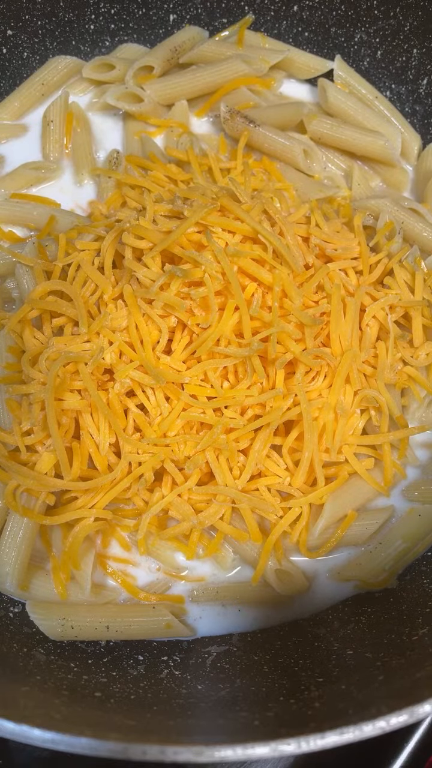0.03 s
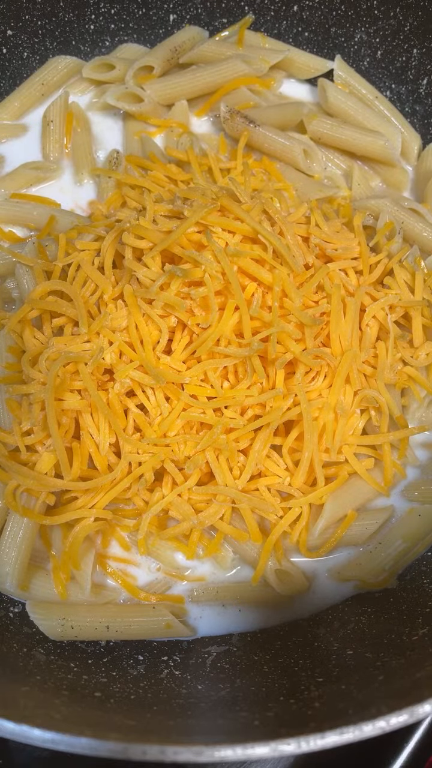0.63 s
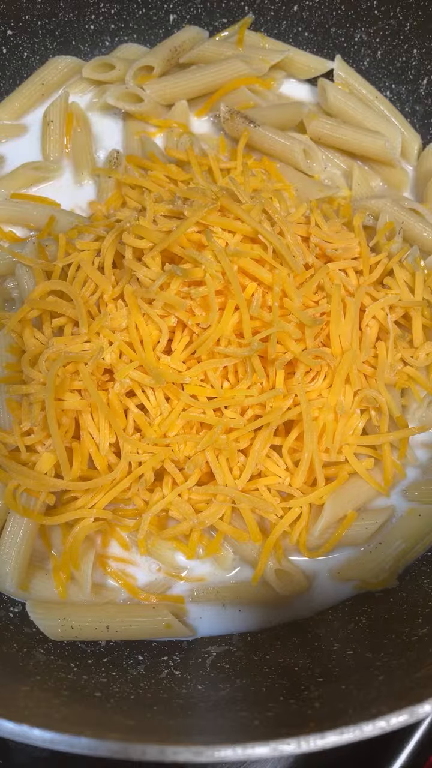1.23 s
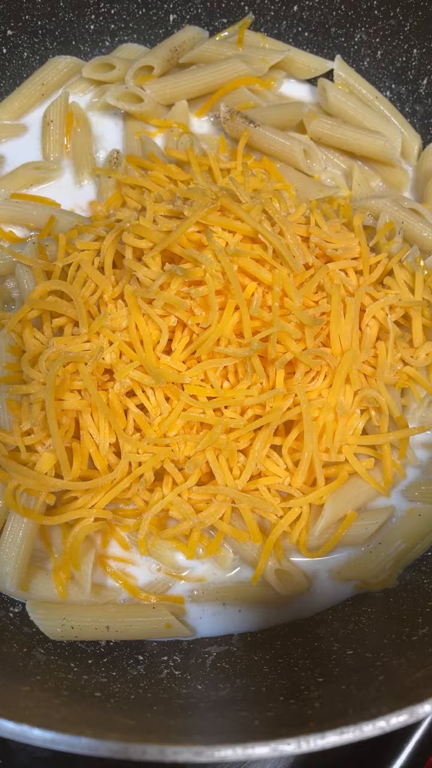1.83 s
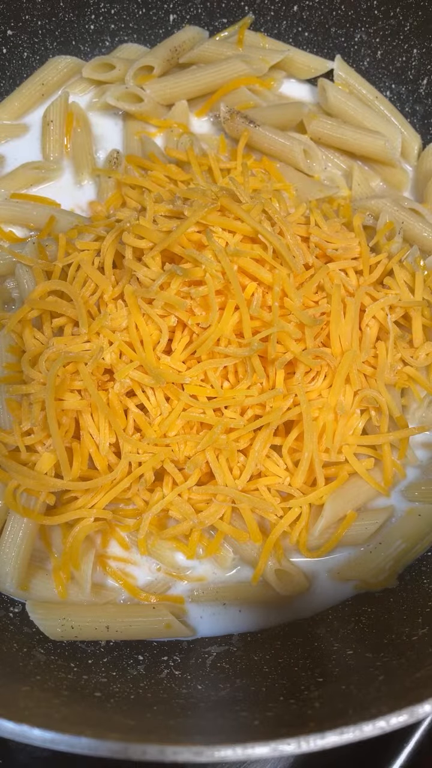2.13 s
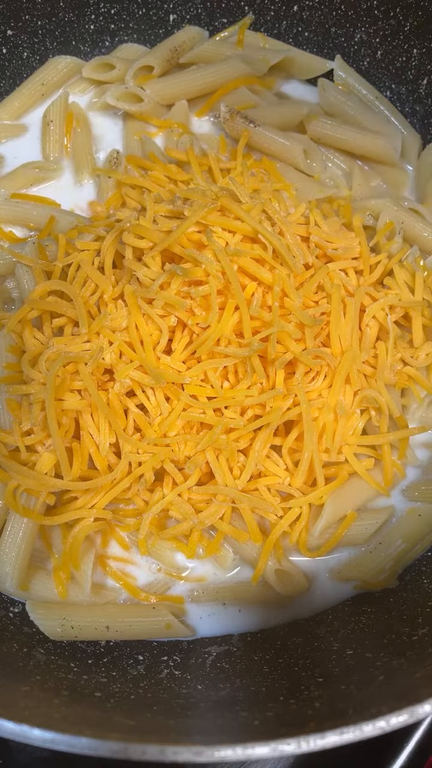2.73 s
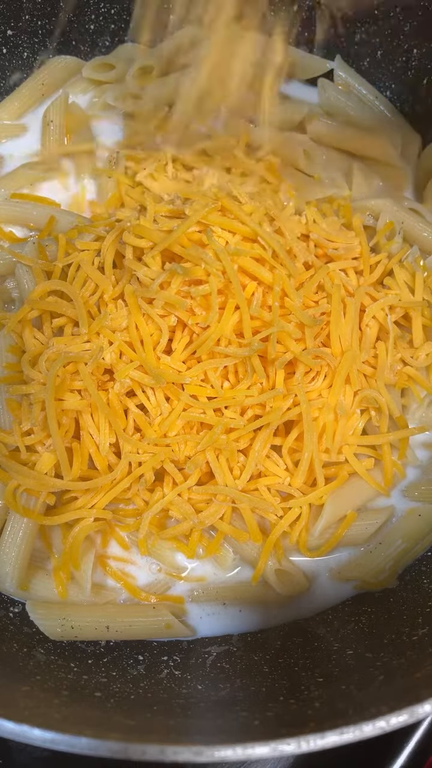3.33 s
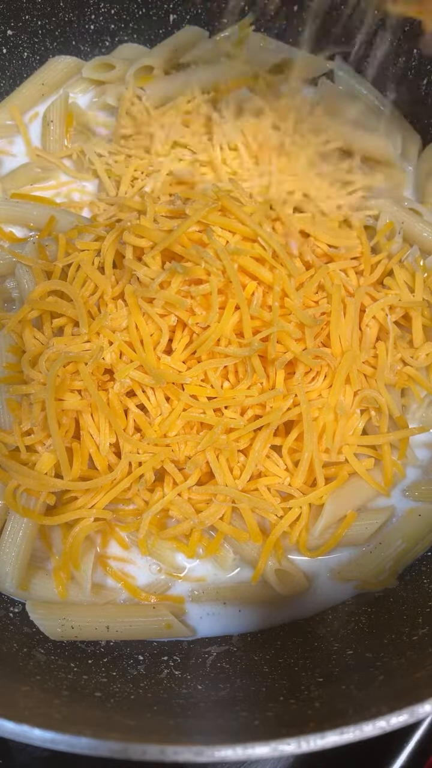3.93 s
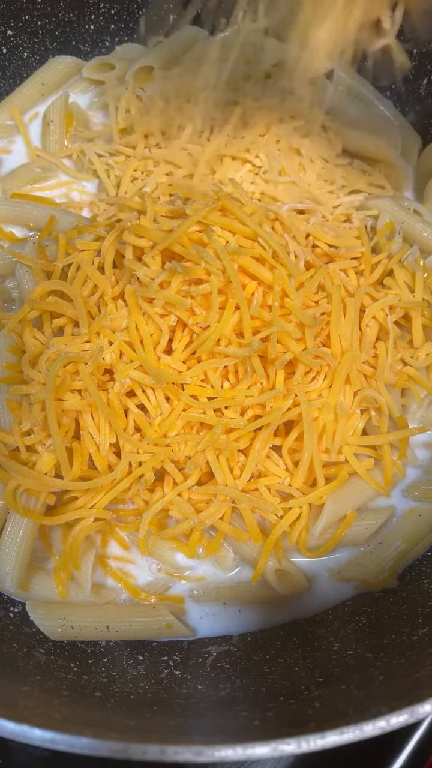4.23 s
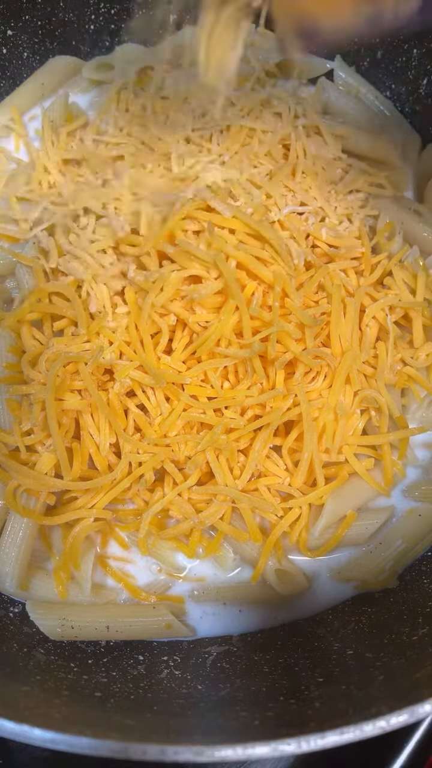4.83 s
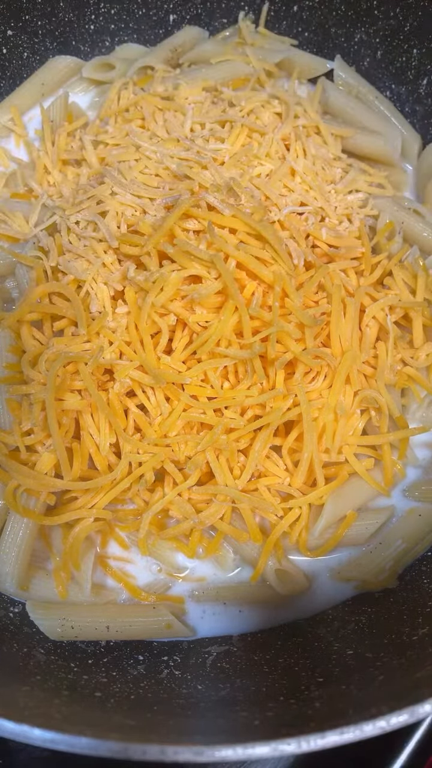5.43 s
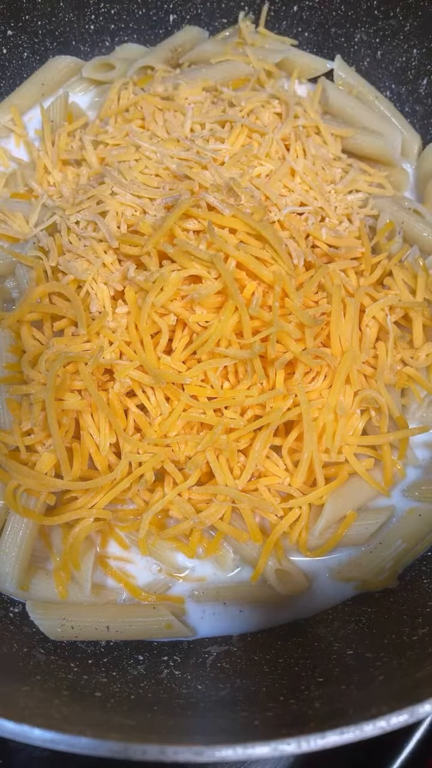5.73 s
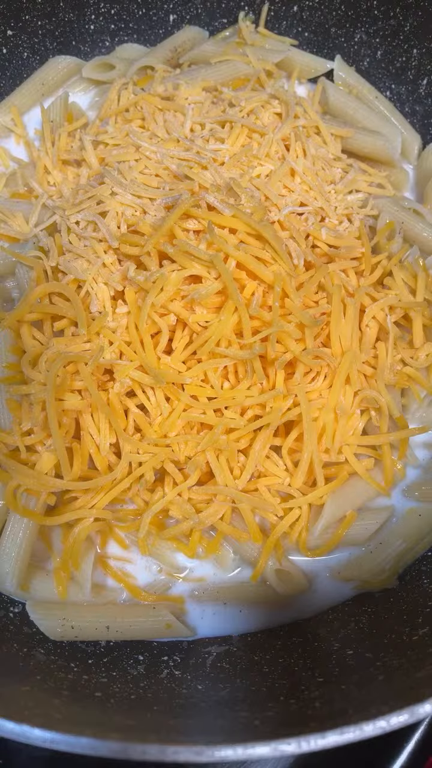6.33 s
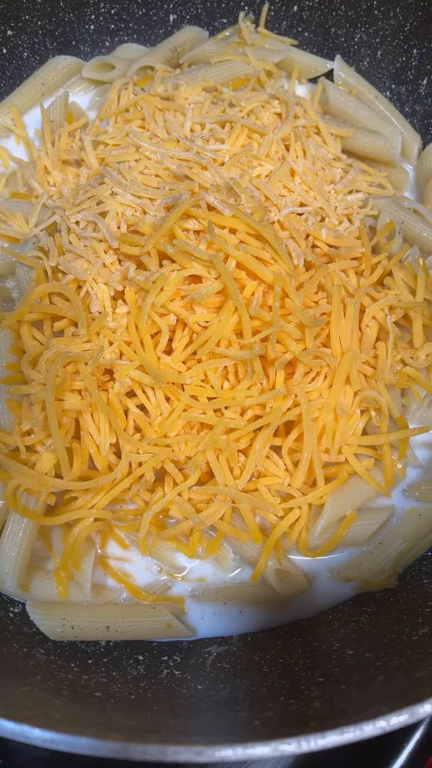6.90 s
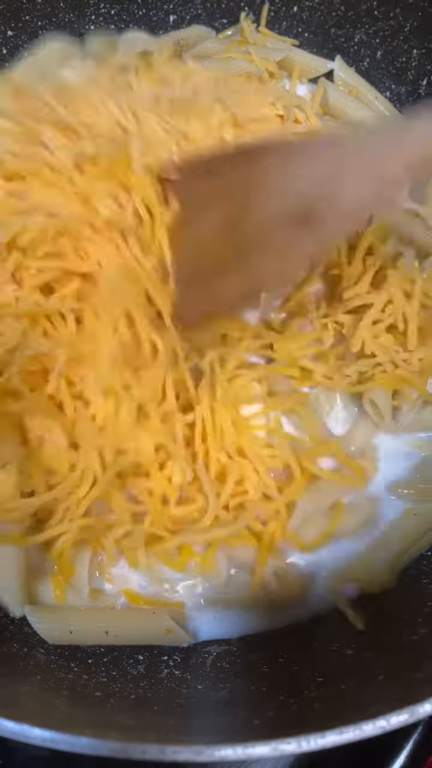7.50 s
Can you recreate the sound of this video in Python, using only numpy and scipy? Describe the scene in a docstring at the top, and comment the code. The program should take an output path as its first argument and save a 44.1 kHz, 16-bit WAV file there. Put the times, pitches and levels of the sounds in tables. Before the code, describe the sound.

In a small kitchen with a faint appliance hum, a plastic bag is handled and opened close by with sharp crackles. A run of fast, swishing shakes follows, fading as shredded cheese drops onto pasta with light pats. After another spell of crinkling, a wooden spatula hits the pan with a loud clack and makes a short, wet stir.

```python
"""First you hear a plastic bag crinkle close by: its film hisses and its creases snap as it is pulled open.
The bag is shaken over a pan of pasta, so shredded cheese tumbles inside it and patters down.
After more crinkling, a wooden spatula knocks the pan and pushes through the sticky pasta.
A small kitchen adds a short echo and a low hum."""
import sys
import numpy as np
from scipy import signal
from scipy.fft import rfft, irfft, next_fast_len
from scipy.io import wavfile

SR = 44100
rng = np.random.default_rng(int(sys.argv[2]) if len(sys.argv) > 2 else 0)


def wrap_up_sound(samples):
    """Save the sound to the file named by the first command line argument, as 16-bit audio."""
    columns = np.atleast_2d(samples).T
    # keep every value between -1 and 1, then stretch to whole-number steps
    tamed = np.clip(columns, -1, 1)
    steps = np.round(tamed * 32767).astype(np.int16)
    wavfile.write(sys.argv[1], SR, steps)


N = 337806


def amp(db):
    """Turn decibels into a gain to multiply by."""
    return 10 ** (np.asarray(db) / 20)


def unit(x):
    """Scale x to an average strength (rms) of 1."""
    return x / np.sqrt(np.mean(x ** 2) + 1e-20)


def along(points, hz):
    """Look up hz between (frequency, value) points, on a log frequency scale."""
    freqs, values = np.transpose(points)
    return np.interp(np.log(hz + 1), np.log(freqs), values)


def coloured(x, spectrum):
    """Give x a tone colour: the spectrum says how strong each frequency is."""
    size = 4096
    gains = amp(along(spectrum, np.fft.rfftfreq(size, 1 / SR)))
    cepstrum = irfft(np.log(gains))
    cepstrum[1:size // 2] *= 2  # fold it so the filter never rings ahead of a sound
    cepstrum[size // 2 + 1:] = 0
    return signal.fftconvolve(x, irfft(np.exp(rfft(cepstrum))))[:len(x)]


def add(track, s, sound):
    """Mix a sound into the track, starting at s seconds."""
    start = max(0, round(s * SR))
    track[start:start + len(sound)] += sound[:max(0, N - start)]


def ring(t, hz, t60, attack):
    """The tone of something struck: it fades by 60 dB in t60 seconds."""
    return np.sin(2 * np.pi * hz * t) * amp(-60 * t / t60) * (1 - np.exp(-t / attack))


def swell(t, s, width):
    """A smooth rise and fall around time s, about width seconds to each side."""
    return np.exp(-.5 * np.minimum(((t - s) / width) ** 2, 60))


def presses(rows, grip_db_per_s=900, relax_db_per_s=404):
    """The gain of (start, hold, level) pushes that build fast, hold and let go more slowly."""
    t = np.arange(N) / SR
    level = np.full(N, -140.0)
    for s, hold, db in rows:
        drop_db = np.maximum(grip_db_per_s * (s - t), relax_db_per_s * (t - s - hold))
        level = np.maximum(level, db - np.maximum(drop_db, 0))
    return amp(level)


def hush(spectrum):
    """Steady noise with the given tone colour."""
    return unit(coloured(rng.standard_normal(N), spectrum))


def grains(rate, hz, octaves, cycles):
    """Tiny taps, rate of them a second, each with its own pitch and size."""
    when, tuning, size = np.hsplit(rng.random((int(rate * N / SR), 3)), 3)
    pitch = hz * 2 ** (octaves * (tuning - .5))
    samples = np.arange(SR // 100)
    taps = size ** 3 * ring(samples / SR, pitch, cycles / pitch, attack=.0003)
    places = (when * N).astype(int) + samples
    return unit(np.bincount(places.ravel(), taps.ravel(), N)[:N])


def crackle(spectrum, rate, life, smooth):
    """Little bursts, each about life seconds long, over even rubbing noise of strength smooth."""
    ticks = (rng.random(N) < rate / SR) * rng.random(N) ** 4
    power = signal.lfilter([1], [1, -np.exp(-1 / (life * SR))], ticks)
    gain = np.sqrt(power / power.mean() + smooth ** 2)
    return unit(coloured(rng.standard_normal(N) * gain, spectrum))


# Tone colour of the quiet kitchen: f/Hz, level/dB
KITCHEN_COLOUR = [(40, -33), (65, -9), (140, 2.5), (200, -10), (300, -5), (560, -11.5), (2800, -31.5),
                  (11000, -28), (15800, -44)]
def background():
    """An appliance hums over steady room noise."""
    hum = amp(-59.5) * unit(np.sin(2 * np.pi * 120 * np.arange(N) / SR))
    return hum + amp(-52.5) * hush(KITCHEN_COLOUR)


# How long the echo takes to fade by 60 dB: f/Hz, t/s
ECHO_FADE = [(150, 0.53), (3000, 0.19), (14000, 0.24)]
def kitchen_echo(x, delay_s=0.0048):
    """The walls send back a short echo in which each frequency fades at its own speed."""
    hz, t, noise = signal.stft(rng.standard_normal(SR // 2), SR, nperseg=256)
    fade = amp(-60 * t / along(ECHO_FADE, hz)[:, None])
    tail = signal.istft(noise * fade, SR, nperseg=256)[1]
    delayed = np.pad(x, (int(delay_s * SR), 0))
    return signal.fftconvolve(delayed, tail / np.linalg.norm(tail))[:N]


# Tone colour of the heap of food: f/Hz, level/dB
HEAP_COLOUR = [(40, -32), (75, 4.5), (150, 3.5), (300, 5.5), (800, -37.5)]
def rumble(db):
    """The low, dull noise under the moving food and bag."""
    return amp(db) * hush(HEAP_COLOUR)


# Tone colours of the bright plastic film and of the hollow of the bag: f/Hz, level/dB
FILM_COLOUR = [(1200, -12.5), (2500, 2), (3500, 5), (5000, 3.5), (7700, -0.5), (9500, 1.5), (12000, 0),
               (13500, -8.5), (15800, -17)]
HOLLOW_COLOUR = [(120, -12.5), (520, 5), (720, 1.5), (1150, 6), (1490, 7), (1640, 5.5), (1820, 7),
                 (2650, -1), (7000, -26)]
# Light slides of the film: middle t/s, half-width t/s, level/dB
FILM_SLIDES = [(5.321, 0.058, -41), (6.81, 0.044, -53)]
def sliding():
    """The film slides lightly over itself with an even hiss."""
    t = np.arange(N) / SR
    gain = sum(amp(db) * swell(t, s, width) for s, width, db in FILM_SLIDES)
    return gain * (hush(FILM_COLOUR) + amp(-0.5) * (hush(HOLLOW_COLOUR) + rumble(-17)))


# Pushes through the pasta: start t/s, hold t/s, level/dB
PASTA_STIRS = [(7.385, 0.068, -43), (7.565, 0.021, -48)]
def stirring():
    """The spatula drags through sticky pasta with small wet clicks."""
    squelch = crackle(HOLLOW_COLOUR, rate=240, life=.0009, smooth=0.84)
    clicks = crackle(FILM_COLOUR, rate=200, life=0.00058, smooth=0.74)
    return presses(PASTA_STIRS) * (squelch + amp(-7.5) * clicks + rumble(-1))


# How loud the falling cheese is: t/s, level/dB
CHEESE_FALL = [(2.6, -87), (3, -65), (4.55, -60), (4.8, -42), (4.88, -33), (4.95, -49), (5.008, -36),
               (5.15, -76), (5.6, -100)]
def patter():
    """Shreds land with soft pats, light ticks and a low rumble; the last clumps fall thickest."""
    gain = amp(np.interp(np.arange(N) / SR, *np.transpose(CHEESE_FALL)))
    pats = grains(rate=800, hz=1330, octaves=0.46, cycles=3.2)
    ticks = crackle(FILM_COLOUR, rate=150, life=0.00055, smooth=0.79)
    return gain * (pats + amp(-10) * ticks + rumble(-15))


# Knocks of the bag and the cheese in it: t/s, level/dB, f/Hz
BAG_BUMPS = [(.074, -24, 890), (1.372, -15.5, 810), (1.439, -13.5, 890), (1.747, -23, 497),
             (6.325, -30, 830), (6.692, -22.5, 573)]
def bumps():
    """The cheese shifts in the bag with a short, dry knock and a soft, low thud."""
    out, t = np.zeros(N), np.arange(SR // 8) / SR
    thud = amp(-14.5) * ring(t, 118, 0.1, 0.0036)
    for s, db, hz in BAG_BUMPS:
        knock = ring(t, hz, 0.014, 0.0001) + 0.63 * ring(t, hz * 3.3, 0.015, 0.0006)
        add(out, s, amp(db) * (knock + thud))
    return out


# Tones of spatula and pan ringing together: f/Hz, level/dB, t/s to fade by 60 dB
PAN_TONES = [(150.6, -36.5, 0.64), (250, -34, 0.081), (660, -21.5, 0.047), (1130, -10.5, 0.028),
             (1530, -25, 0.039), (2070, -15.5, 0.029), (3070, -14.5, 0.014)]
# Hits on the pan: t/s, level/dB
PAN_KNOCKS = [(7.35, -29), (7.3593, 0.5), (7.553, -32)]
def spatula(clack_hz=1420, clack_half_s=0.00052):
    """Wood strikes the full pan: a hard clack, quickly fading tones, a low ring and crunching food."""
    out, t = np.zeros(N), np.arange(SR // 2) / SR
    from_peak = t - .0009
    pulse = np.exp(-np.abs(from_peak / clack_half_s) ** 1.5)  # the blade swings little more than once
    clack = amp(-1.5) * np.cos(2 * np.pi * clack_hz * from_peak) * pulse
    onset = 1 - np.exp(-(t / .0015) ** 2)
    tones = sum(amp(db - 60 * t / t60) * np.sin(2 * np.pi * hz * t) for hz, db, t60 in PAN_TONES)
    for s, db in PAN_KNOCKS:
        crack = amp(-26) * coloured(burst(t, t60=0.044), FILM_COLOUR)
        crunch = amp(-14) * coloured(burst(t, t60=0.05), HOLLOW_COLOUR)
        add(out, s, amp(db) * (clack + onset * tones + crack + crunch))
    return out


def burst(t, t60):
    """A puff of noise that fades by 60 dB in t60 seconds."""
    return rng.standard_normal(len(t)) * amp(-60 * t / t60)


# Flexing of the loosely held bag: t/s, level/dB
LOOSE_HOLD = [(0, -70), (1.2, -55.5), (1.5, -51), (2.1, -61), (2.6, -63.5), (5.1, -54.5), (5.45, -50.5),
              (5.85, -57), (6.25, -59), (7.3, -69)]
# Squeezes of the bag: start t/s, hold t/s, hiss level/dB, flexing level/dB
BAG_SQUEEZES = [(0.01, .11, -46, -48), (0.317, 0.11, -56.5, -56), (0.466, 0.05, -46.5, -47.5),
                (0.626, 0.076, -45, -45.5), (0.805, 0.081, -53, -49.5), (1.077, 0.2, -58, -72),
                (1.278, 0.12, -38, -48), (1.365, 0.067, -34, -30), (1.545, 0.16, -44.5, -42),
                (1.702, 0.052, -29, -27), (1.801, 0.15, -44.5, -39), (2.142, 0.055, -47, -41.5),
                (2.328, 0.034, -34.5, -33), (2.628, 0.0063, -56, -49), (5.52, .04, -55.5, -50.5),
                (5.857, 0.13, -46, -43), (6.075, .025, -46.5, -53)]
def handling():
    """How strongly the hand makes the bag hiss and flex: squeezes on top of a loose hold."""
    held = amp(np.interp(np.arange(N) / SR, *np.transpose(LOOSE_HOLD)))
    hiss = presses([(s, hold, db) for s, hold, db, _ in BAG_SQUEEZES])
    flex = presses([(s, hold, db) for s, hold, _, db in BAG_SQUEEZES])
    return np.hypot(hiss, amp(-5.5) * held), np.hypot(flex, held)


def rustle(hiss, flex):
    """The film crinkles under the fingers; its sides flex and make the hollow bag sound."""
    film = crackle(FILM_COLOUR, rate=140, life=0.00078, smooth=0.54)
    hollow = crackle(HOLLOW_COLOUR, rate=150, life=0.001, smooth=0.68)
    return hiss * film + flex * (hollow + rumble(-9.5))


# Shakes of the wrist, nearly eight a second: t/s, hiss level/dB
WRIST_SHAKES = [(2.763, -49.5), (2.848, -40), (2.956, -39), (3.088, -36), (3.198, -40.5), (3.327, -37),
                (3.445, -43.5), (3.579, -40), (3.715, -41.5), (3.854, -40.5), (3.984, -44), (4.125, -43),
                (4.253, -46), (4.368, -49.5), (4.493, -49), (4.618, -51.5), (4.731, -42.5)]
def strokes(emptying_db_per_s=0.5):
    """How strongly each shake swishes and tumbles: a quick throw, with cheese settling around it."""
    t = np.arange(SR // 2) / SR
    middle = t.mean()
    throw = swell(t, middle, width=0.016)
    settling = amp(-14) * swell(t, middle, width=0.07)
    swish, tumble = np.zeros((2, N))
    for s, db in WRIST_SHAKES:
        hollow_db = 3.5 + emptying_db_per_s * (s - WRIST_SHAKES[0][0])  # an emptier bag sounds hollower
        add(swish, s - middle, amp(db) * (throw + settling))
        add(tumble, s - middle, amp(db + hollow_db) * (throw + settling))
    return swish, tumble


def shaking(swish, tumble):
    """Shreds tumble and swish along the film, and single ones flick against it."""
    shreds = crackle(HOLLOW_COLOUR, rate=450, life=0.0014, smooth=1.0) + rumble(-8)
    flicks = amp(-5) * grains(rate=120, hz=2740, octaves=1.91, cycles=11)
    film = crackle(FILM_COLOUR, rate=740, life=0.00014, smooth=1.4)
    return swish * film + tumble * (shreds + flicks)


def small_creases(hiss, flex, per_s=22, scatter_db=5):
    """Rows for snaps(): small creases give way at random, louder as the bag is worked, up to a limit."""
    when, size, jitter = rng.random((int(per_s * N / SR), 3)).T
    at = (when * N).astype(int)
    size_db = scatter_db * (jitter - 1 - np.log(size + .01))
    crack_db = np.minimum(20 * np.log10(hiss[at]) + 10 + size_db, -30)
    flex_db = np.minimum(20 * np.log10(flex[at]) - 6 + size_db, -44)
    return list(zip(at / SR, crack_db, flex_db))


# Extra brightness of the tight film until the bag is opened: f/Hz, added level/dB
TIGHT_FILM = [(2500, 1), (6000, 0), (9500, 5), (15000, 5.5)]
# Big creases that buckle: t/s, crack peak level/dB, flexing rms level/dB
BIG_CREASES = [(.0745, -16.5, -39), (.1205, -28, -45), (.609, -27.5, -63), (.6807, -16, -61),
               (.7613, -26, -55), (.8045, -18, -59), (.9248, -21.5, -49.5), (1.0725, -22, -52),
               (1.3245, -13.5, -36.5), (1.3403, -10.5, -55), (1.3465, -7, -33), (1.3689, -5, -28.5),
               (1.3788, -13, -42), (1.5403, -45, -37.5), (1.5723, -33, -47), (1.6683, -17.5, -42),
               (1.707, -13.5, -27.5), (1.7474, -26, -34), (1.8365, -15, -37.5), (1.8582, -12, -40),
               (1.9009, -10.5, -39), (1.971, -19.5, -40.5), (2.172, -42, -37.5), (2.2074, -24.5, -40),
               (2.3283, -32, -33.5), (2.3555, -20, -35), (2.374, -12.5, -42), (2.619, -31.5, -50.5),
               (2.9507, -22, -34), (3.0065, -23, -37.5), (3.08, -41, -32.5), (3.8658, -26, -38.5),
               (3.9843, -19.5, -39.5), (4.1096, -39, -41.5), (4.1731, -31, -41), (4.37, -35, -42),
               (4.5617, -24.5, -39.5), (4.6625, -31, -36), (4.801, -28, -47), (5.0829, -61, -45),
               (5.8372, -35, -43.5), (5.8721, -14.5, -30.5), (5.8896, -24.5, -38.5), (5.9326, -14.5, -38.5),
               (6.0053, -22.5, -50), (6.0817, -18.5, -46), (6.1457, -20, -48), (6.218, -44, -54),
               (6.3147, -34.5, -51.5), (6.3899, -26.5, -56), (6.752, -19.5, -40.5), (6.8953, -37, -46),
               (6.9882, -36.5, -54.5)]
def snaps(small, opened_s=1.6, panel_hz=1692):
    """Each crease, big or small, gives a bright double crack, and the panel of film beside it swings."""
    out, t = np.zeros(N), np.arange(SR // 16) / SR
    crack_t60, shiver_t60 = 0.002, 0.068  # seconds to fade by 60 dB
    first = amp(-60 * t / crack_t60)
    shiver = amp(-10.5 - 60 * t / shiver_t60)
    for s, crack_db, flex_db in BIG_CREASES + small:
        hz = panel_hz * 2 ** (0.19 * rng.standard_normal())
        later = t - 0.0067 * (.5 + rng.random())  # the next fold gives way a moment later
        second = (later > 0) * amp(-10 - 60 * abs(later) / crack_t60)
        colour = [(f, db + (s < opened_s) * along(TIGHT_FILM, f) + 4.5 * rng.standard_normal())
                  for f, db in FILM_COLOUR]  # every crease has its own colour
        crack = coloured(rng.standard_normal(len(t)) * (first + second + shiver), colour)
        hollow = coloured(burst(t, t60=0.061), HOLLOW_COLOUR)
        folds = (t == 0) + .1 * burst(t, t60=.03)  # smaller folds follow and keep the panel ringing
        panel = signal.fftconvolve(folds, ring(t, hz, t60=0.01, attack=0.00016))[:len(t)]
        body = unit(unit(panel) + unit(hollow))
        add(out, s, amp(crack_db) * crack / abs(crack).max() + amp(flex_db) * body)
    return out


def scene():
    """Mix the bag and the pan with the kitchen's echo and hum."""
    hiss, flex = handling()
    swish, tumble = strokes()
    pan = spatula() + stirring()
    bag = rustle(hiss, flex) + sliding() + shaking(swish, tumble) + patter() + bumps()
    bag += snaps(small_creases(hiss + swish, flex + tumble))
    echo = kitchen_echo(amp(-12) * bag + amp(-15.5) * pan)
    return (bag + pan + echo + background())[None]


def record(dry, low_hz=53, top_hz=15900):
    """The microphone loses the deepest bass and the highest treble."""
    dry = signal.sosfilt(signal.butter(6, low_hz, "high", fs=SR, output="sos"), dry)
    size = next_fast_len(N + SR // 2)
    kept = np.fft.rfftfreq(size, 1 / SR) < top_hz
    return irfft(rfft(dry, size) * kept, size)[..., :N]


dry = scene()
out = record(dry)
wrap_up_sound(out)
```